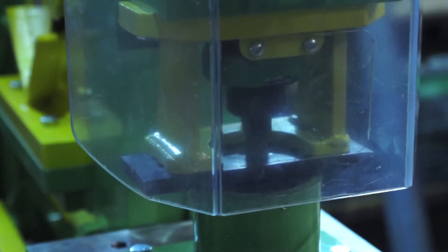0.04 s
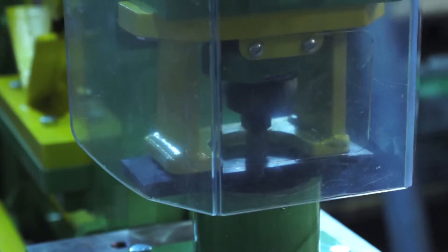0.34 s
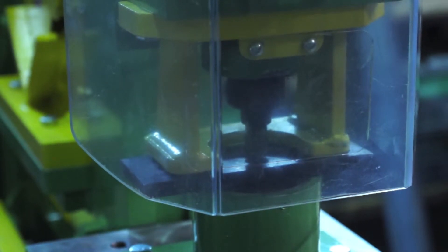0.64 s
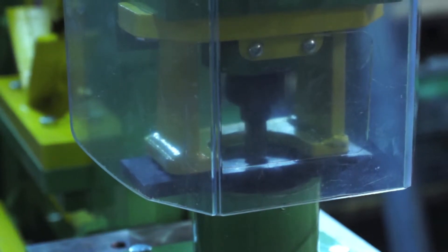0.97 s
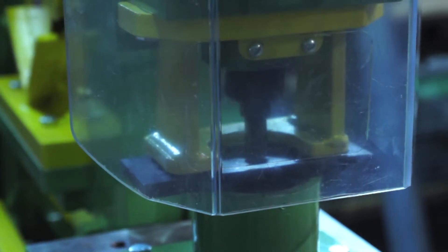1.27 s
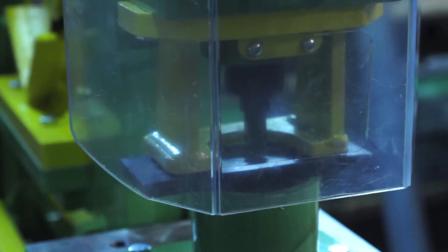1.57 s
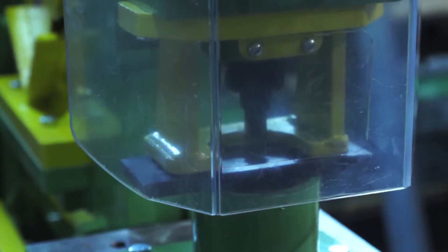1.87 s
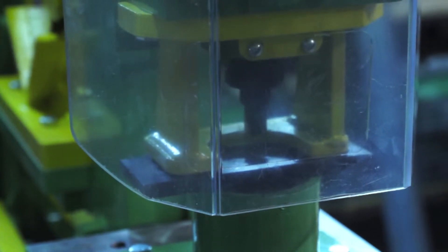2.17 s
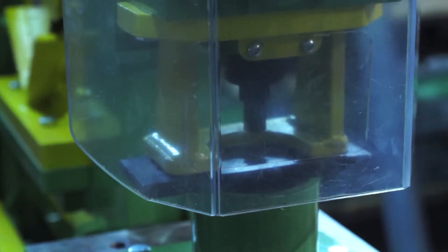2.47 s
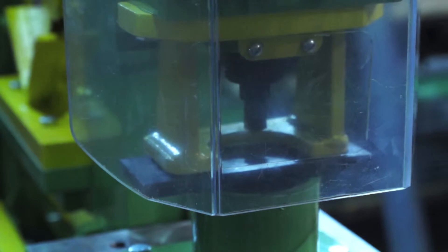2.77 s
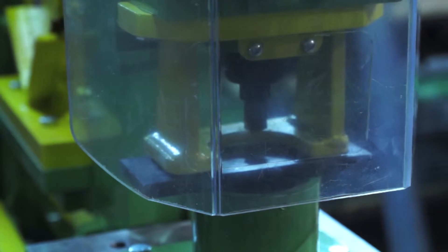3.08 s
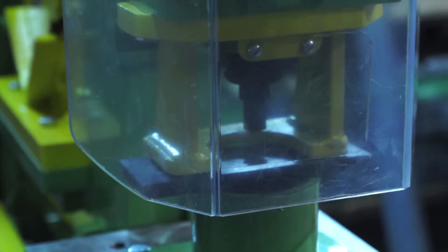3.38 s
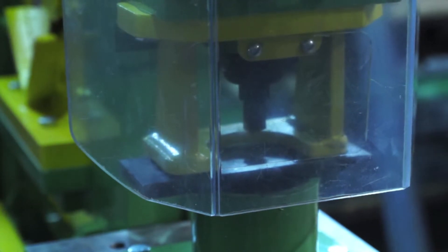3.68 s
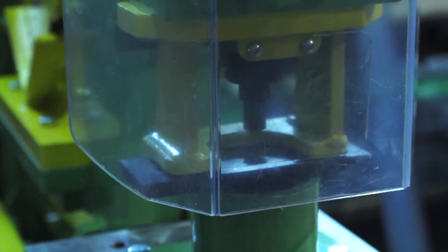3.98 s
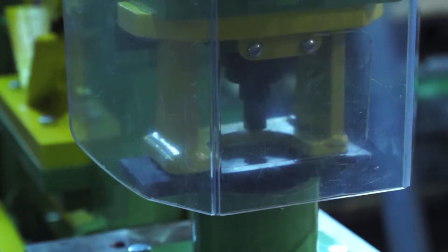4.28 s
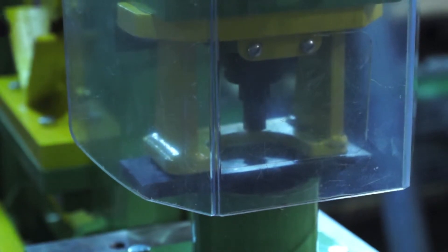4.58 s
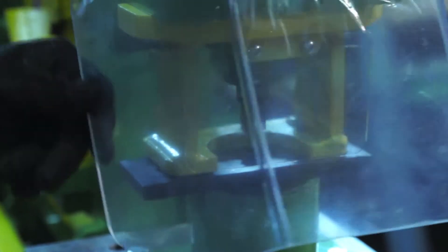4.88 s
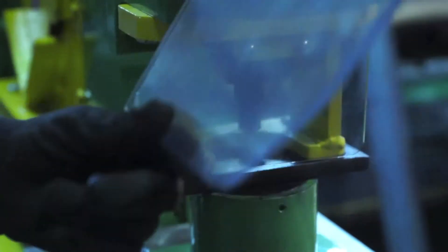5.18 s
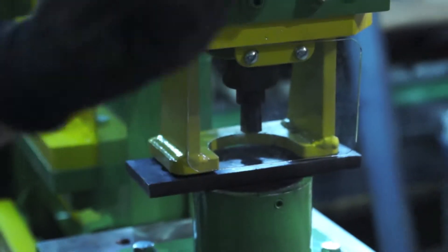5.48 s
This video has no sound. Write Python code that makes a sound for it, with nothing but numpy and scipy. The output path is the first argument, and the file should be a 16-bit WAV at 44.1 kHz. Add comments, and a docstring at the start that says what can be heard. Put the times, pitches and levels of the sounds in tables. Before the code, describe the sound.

In a workshop, a hydraulic punch runs close by with a throbbing pump hum and a thin motor whine. Right at the start the tool bites into steel with a short metallic creak. About halfway, a valve shifts with a gush of oil and the drone rises slightly in pitch. Near the end a plastic guard clatters open while the pump settles to idle.

```python
"""A hydraulic punch in a workshop

A 12-tooth gear pump, turned by an electric motor, hums and throbs as the punch bites into steel.
A valve shifts with a gush of oil, the motor speeds up and the ram (the piston behind the punch)
draws back. Near the end the pump idles, and a gloved hand swings the clattering plastic guard open."""
import sys
import numpy as np
from scipy import signal
from scipy.fft import irfft, next_fast_len
from scipy.io import wavfile
from scipy.ndimage import map_coordinates

SR = 44100
rng = np.random.default_rng(int(sys.argv[2]) if len(sys.argv) > 2 else 0)


def transcribe(signal):
    """Save signal, clipped to [-1, 1], as a 16-bit WAV file at the path in sys.argv[1]."""
    frames = np.atleast_2d(signal).T
    limited = np.clip(frames, -1, 1)
    pcm = np.round(limited * 32767).astype(np.int16)
    wavfile.write(sys.argv[1], SR, pcm)


N = 253134
TIME = np.arange(N) / SR
TEETH, ROTOR_SLOTS, MAINS_HZ = 12, 28, 60
REVERSE_S, REVERSE_TAKES_S = 2.592, 0.045   # the valve goes from pressing to lifting
RELEASE_S, RELEASE_TAKES_S = 4.835, 0.075   # then from lifting to idling


# The pump's stand-out tones in each state: multiple_of_tooth_rate, left_db, right_db
PRESS_TONES = [(1, -34.5, -46.5), (2, -12, -17), (3, -30, -53), (4, -32.5, -34.5), (5, -41.5, -37.5),
               (6, -35, -39), (7, -32, -34), (8, -40, -36.5), (10, -43, -41.5), (12, -50, -37),
               (13, -46.5, -49), (17, -47, -48.5), (19, -55.5, -51.5), (23, -53, -51)]
LIFT_TONES = [(1, -16, -18.5), (2, -17.5, -18.5), (3, -31, -37.5), (4, -38.5, -38), (5, -42.5, -40.5),
              (6, -40, -44), (7, -37.5, -37), (9, -44, -39.5), (10, -34, -30), (12, -40, -43),
              (13, -41, -48), (15, -47, -51), (16, -42.5, -43.5), (26, -55, -53)]
IDLE_TONES = [(1, -18.5, -20), (2, -50, -27), (3, -30.5, -48), (4, -31.5, -32), (5, -37, -37.5),
              (6, -41, -39.5), (7, -38, -42), (10, -35.5, -46), (12, -47, -46.5), (13, -51, -46.5),
              (16, -47, -46), (18, -45, -52)]

def pump_hum(turns, press, lift, idle, hum_db):
    """The pump throbs most while pressing, and its overtones grow as the ram rises."""
    growth_db = 0.84 * (TIME - (REVERSE_S + RELEASE_S) / 2)
    pressing = tooth_pulses(tone_levels(PRESS_TONES, weak_db=-50, db_per_octave=-9.5), turns, hum_db,
                            throb=.18, sway=.017, flutter=.068, flutter_hz=24)
    lifting = tooth_pulses(tone_levels(LIFT_TONES, weak_db=-56, db_per_octave=-7.5), turns, hum_db,
                           throb=.05, sway=.015, flutter=.047, flutter_hz=14, overtone_db=growth_db)
    idling = tooth_pulses(tone_levels(IDLE_TONES, weak_db=-53, db_per_octave=-9), turns, hum_db,
                          throb=.079, sway=.053, flutter=.091, flutter_hz=13)
    return press * pressing + lift * lifting + idle * idling


def tone_levels(stand_outs, weak_db, db_per_octave):
    """Left and right levels of 29 tones: the stand-outs, and weak ones scattered around a slope."""
    multiples = np.arange(1, 30)
    slope_db = weak_db + db_per_octave * np.log2(multiples / TEETH)
    levels_db = slope_db[:, None] + 3 * rng.standard_normal((len(multiples), 2))
    for multiple, left_db, right_db in stand_outs:
        levels_db[round(multiple) - 1] = left_db, right_db
    return zip(multiples, levels_db)


# The column of oil rings lower as the ram goes down, higher as it comes back: time_s, pitch_hz
OIL_COLUMN = [(0, 6900), (.6, 4180), (1.0, 3780), (1.6, 1920), (2.45, 1105), (2.8, 1160), (4.7, 1820),
              (5.74, 1510)]

def tooth_pulses(levels, turns, hum_db, throb, sway, flutter, flutter_hz, overtone_db=0):
    """Each gear tooth pushes out a pulse of oil; the gears run tight once a turn, making a throb."""
    out = np.zeros((2, N))
    column_hz, = in_time(OIL_COLUMN)
    speed, = in_time(SHAFT_SPEED)
    column_octave = np.log2(column_hz / (TEETH * speed))
    # the overtones drop out while the valve reverses
    seated = 1 - ramp(REVERSE_S, REVERSE_TAKES_S / 2) + ramp(REVERSE_S + REVERSE_TAKES_S, 0.049)
    for k, sides_db in levels:
        # an overtone swells as the oil column's pitch slides past it
        swell_db = 3 * np.exp(-((np.log2(k) - column_octave) / 0.44) ** 2)
        if k > 2:
            swell_db = swell_db + drift(7) + overtone_db * (k > 3)
        strength = from_db(hum_db) if k == 1 else seated * from_db(swell_db)
        # slightly off-centre gears sway each overtone once a turn
        wobble = min(sway * (k - 1), .55) * np.cos(2 * np.pi * (turns + rng.random()))
        waver = flutter * np.sqrt(k)
        phase = 2 * np.pi * (k * TEETH * turns + rng.random() * (k > 2)) + waver * drift(flutter_hz)
        level = strength * (1 + wobble + waver * drift(flutter_hz))
        out += from_db(sides_db[:, None]) * level * stereo_sine(phase)
    return out * (1 + throb * np.cos(2 * np.pi * (turns - .42)))


# The colour of the pump's rushing noise in each state: pitch_hz, relative_db
PRESS_RUSH = [(50, -86), (140, -81), (200, -65), (330, -55), (480, -59), (680, -51.5), (830, -59.5),
              (1000, -49), (1170, -65), (2300, -64), (3400, -63.5), (5000, -71), (7200, -77.5),
              (10500, -77.5)]
LIFT_RUSH = [(50, -92), (140, -75), (200, -69), (330, -62), (480, -62.5), (680, -57.5), (830, -65.5),
             (1000, -57), (1170, -65.5), (2300, -69.5), (3400, -72.5), (5000, -79.5), (7200, -84),
             (10500, -83.5)]
IDLE_RUSH = [(50, -77), (140, -72), (200, -62), (330, -65), (480, -60.5), (680, -57.5), (830, -65),
             (1000, -60), (1170, -65.5), (2300, -71.5), (3400, -73), (5000, -76.5), (7200, -85.5),
             (10500, -81)]

def pump_rush(spectrum, turns, gear_db, oil_db, left_db, churn):
    """No two teeth are alike, so a rough pattern repeats every turn; swirling oil adds a hiss."""
    turn_hz = np.mean(np.array(SHAFT_SPEED)[:, 1])
    multiples, size = np.arange(400), 2 ** 14
    hz = multiples * turn_hz
    tones = random_stereo(hz) * from_db(at_hz(spectrum, hz)) * np.sqrt(turn_hz / 2)
    between_teeth = multiples % TEETH > 0
    one_turn = irfft(tones * between_teeth, size) * size
    gears = one_turn[:, (turns % 1 * size).astype(int)]
    churning = 1 + churn * np.cos(2 * np.pi * TEETH * turns)
    oil = noise(lambda f: from_db(at_hz(spectrum, f))) * churning
    return (from_db(gear_db) * gears + from_db(oil_db) * oil) * lean_left(left_db)


# The motor's shaft, which turns slower under load: time_s, turns_per_s
SHAFT_SPEED = [(0, 27.968), (2.59, 27.968), (2.67, 29.468), (5.74, 29.475)]

def shaft_turns():
    """How many turns the slightly unsteady shaft has made so far."""
    speed, = in_time(SHAFT_SPEED)
    return np.cumsum(speed + 0.0088 * drift(9)) / SR


# Pressure surges as the oil reverses and as the ram reaches the top:
# start_s, rise_s, hold_s, fall_s, hum_change_db, rush_change_db
SURGES = [(2.578, 0.054, .05, 0.14, -4, 8.5), (4.458, .08, .36, .08, 6, 4)]

def back_pressure():
    """Surges swell the rush and dip or lift the lowest tone, which also sags as the ram rises."""
    lifted_s = np.clip(TIME - REVERSE_S, 0, RELEASE_S - REVERSE_S)
    hum_db, rush_db = -1.5 * lifted_s, 0
    for start_s, rise_s, hold_s, fall_s, hum_change_db, rush_change_db in SURGES:
        surge = ramp(start_s, rise_s) - ramp(start_s + rise_s + hold_s, fall_s)
        hum_db += hum_change_db * surge
        rush_db += rush_change_db * surge
    return hum_db, rush_db


# The guard knocks on its hinge: start_s, relative_db
KNOCKS = [(4.844, -10.5), (4.862, -17), (4.882, -15.5), (4.912, -17), (4.935, -14.5), (4.955, -19),
          (4.988, -18), (5.022, -17)]
# How its plastic panels ring: pitch_hz, width_hz, relative_db
GUARD_RINGS = [(206, 56, -9.5), (450, 280, 2), (590, 100, 0), (780, 200, 2), (954, 170, 2), (1420, 330, -6),
               (3040, 2300, -3.5)]

def guard_clatter():
    """Each knock rattles the plastic panels, and the room draws the rattle out."""
    rattle = noise(lambda f: sum(from_db(db) * resonance(f, hz, width) for hz, width, db in GUARD_RINGS))
    power = sum((from_db(db) * burst(start_s, rise_s=.0067, fade_s=.18)) ** 2 for start_s, db in KNOCKS)
    return np.sqrt(power) * rattle / np.std(rattle) * from_db(-4)


# Oil squeezes through the valve: start_s, level_db, pitch_hz, width_hz, rise_s, fade_s
GUSHES = [(2.58, -22, 800, 900, .02, .3), (2.585, -25, 1900, 1400, .02, .28),
          (2.59, -26, 170, 200, .035, .22), (2.675, -32, 200, 180, .02, .3)]

def valve_gush():
    """Short spurts of oil ring in the valve block and pipes."""
    return sum(from_db(db) * burst(start_s, rise_s, fade_s) * noise(lambda f: resonance(f, hz, width))
               for start_s, db, hz, width, rise_s, fade_s in GUSHES)


# The punch bites into the plate: start_s, relative_db
BITES = [(.095, 2.5), (.215, -9.5)]
# How the punch and the die under it ring: pitch_hz, width_hz, relative_db, fade_s
TOOL_RINGS = [(1580, 130, -27, .3), (2230, 500, -30.5, .3), (3400, 820, -38, .4), (4590, 60, -34, 0.58)]

def punch_creak():
    """Each bite into the steel makes the tools ring briefly, the highest pitch longest."""
    out = 0
    for hz, width, db, fade_s in TOOL_RINGS:
        bites = sum(from_db(bite_db) * burst(start_s, .012, fade_s) for start_s, bite_db in BITES)
        out += from_db(db) * noise(lambda f: resonance(f, hz, width)) * bites
    return out


# The motor's three magnetic tones, low to high: pressing_db, lifting_db, idling_db
WHINE = [(-30, -39.5, -41.5), (-39.5, -32.5, -37), (-40, -45, -46)]

def motor_whine(turns, states):
    """Slots in the spinning rotor chop the magnetic field into a whine, over a faint mains hum."""
    whine = 0
    for mains_multiple, levels_db in zip((-2, 2, 4), WHINE):
        level = from_db(levels_db) @ np.array(states)
        cycles = ROTOR_SLOTS * turns + mains_multiple * MAINS_HZ * TIME
        whine -= level * stereo_sine(2 * np.pi * cycles)
    mains_hum = from_db(-59.5) * stereo_sine(2 * np.pi * 2 * MAINS_HZ * TIME)
    return whine * lean_left(2.5) + mains_hum


# Where the pump's casing sings: multiple_of_shaft_speed
CASING_MULTIPLES = (26, 33, 35, 74, 75)
# How loud each of those tones is: loaded_db, unloaded_db
CASING_LEVELS = [(-36, -42), (-42, -41), (-41, -59), (-69, -45.5), (-64, -46.5)]

def casing_song(turns, load):
    """Multiples of the shaft speed sing out where they match a natural pitch of the casing."""
    out = 0
    for k, (loaded_db, unloaded_db) in zip(CASING_MULTIPLES, CASING_LEVELS):
        level = from_db(unloaded_db + load * (loaded_db - unloaded_db))
        out += level * stereo_sine(2 * np.pi * (k * turns + rng.random()))
    return out


def wall_echo():
    """The loudest pressing tone comes back off the walls and beats with the new, higher one."""
    hz = 2 * TEETH * SHAFT_SPEED[0][1]
    return from_db(-22) * burst(2.63, rise_s=.025, fade_s=.55) * stereo_sine(2 * np.pi * hz * TIME)


def from_db(db):
    """Turn decibels into a gain."""
    return 10 ** (np.asarray(db) / 20)


def ramp(start_s, takes_s):
    """A straight rise from 0 to 1."""
    return np.clip((TIME - start_s) / takes_s, 0, 1)


def burst(start_s, rise_s, fade_s):
    """A level that rises, then drops 60 dB in fade_s."""
    fading_s = np.maximum(TIME - start_s - rise_s, 0)
    return ramp(start_s, rise_s) * from_db(-60 * fading_s / fade_s)


def drift(rate_hz):
    """A smooth random wander, about 1 in size, that changes about rate_hz times a second."""
    coarse_s = TIME[::32]
    slow = map_coordinates(rng.standard_normal(1024), [coarse_s * rate_hz], order=3, mode="wrap")
    return np.interp(TIME, coarse_s, slow)


def in_time(rows):
    """Read a table of times and values at every sample."""
    time_s, *columns = np.transpose(rows)
    return [np.interp(TIME, time_s, column) for column in columns]


def at_hz(rows, hz):
    """Read a table of pitches and values at hz, with octaves evenly spaced."""
    pitch_hz, values = np.transpose(rows)
    return np.interp(np.log(np.maximum(hz, 1)), np.log(pitch_hz), values)


def resonance(hz, centre_hz, width_hz):
    """How strongly something that rings at centre_hz answers each pitch; total power is near 1."""
    detune = (hz ** 2 - centre_hz ** 2) / (np.maximum(hz, 1) * width_hz)
    return 1 / (1 + detune ** 2) / np.sqrt(width_hz * np.pi / 4)


def lean_left(left_db):
    """Two gains that make the left side left_db louder than the right."""
    return from_db(np.array([[.5], [-.5]]) * left_db)


def stereo_sine(phase, left_lead_rad=0.84):
    """A pure tone of power 1 that reaches the left side first."""
    return np.sqrt(2) * np.cos(phase + np.array([[.5], [-.5]]) * left_lead_rad)


# How alike the left and right sides of the noise are: pitch_hz, likeness (0 to 1)
LIKENESS = [(40, 0.25), (130, 0.69), (300, 0.22), (600, 0.34), (1200, 0.12), (2400, 0.47), (5000, 0.14),
            (10000, 0.24)]

def random_stereo(hz):
    """A random strength and phase for each pitch, partly shared by left and right."""
    mid, side = (rng.standard_normal((2, len(hz))) + 1j * rng.standard_normal((2, len(hz)))) / 2
    alike = np.clip(at_hz(LIKENESS, hz), 0, 1)
    return np.sqrt(1 + alike) * mid + np.sqrt(1 - alike) * side * [[1], [-1]]


def noise(gain_at):
    """Stereo noise whose strength at each pitch is set by gain_at(hz)."""
    size = next_fast_len(N, real=True)
    hz = np.arange(size // 2 + 1) * SR / size
    return irfft(random_stereo(hz) * gain_at(hz), size)[:, :N] * np.sqrt(size * SR / 2)


def scene():
    """The valve fades the pump from pressing to lifting to idling while the shaft keeps turning."""
    turns = shaft_turns()
    press, idle = 1 - ramp(REVERSE_S, REVERSE_TAKES_S), ramp(RELEASE_S, RELEASE_TAKES_S)
    lift = 1 - press - idle
    hum_db, rush_db = back_pressure()
    hum = pump_hum(turns, press, lift, idle, hum_db)
    rush = press * pump_rush(PRESS_RUSH, turns, gear_db=-4.5, oil_db=-2.5, left_db=2.0, churn=.25)
    rush += lift * pump_rush(LIFT_RUSH, turns, gear_db=-9.5, oil_db=-2.0, left_db=1.8, churn=.31)
    rush += idle * pump_rush(IDLE_RUSH, turns, gear_db=-6.0, oil_db=-1.3, left_db=1.5, churn=.13)
    pump = hum + from_db(rush_db) * rush + casing_song(turns, press)
    motor = motor_whine(turns, (press, lift, idle))
    return pump + motor + punch_creak() + valve_gush() + guard_clatter() + wall_echo()


def record(dry):
    """The microphone thins the bass below 40 Hz, and the treble is cut steeply above 11050 Hz."""
    thinned = signal.sosfilt(signal.butter(1, 40, "high", fs=SR, output="sos"), dry)
    return signal.sosfilt(signal.ellip(14, .1, 90, 11050, fs=SR, output="sos"), thinned)


dry = scene()
out = record(dry)
transcribe(out)
```